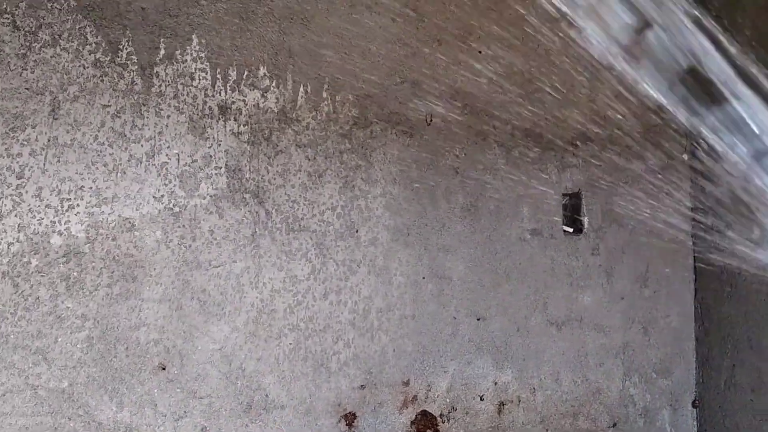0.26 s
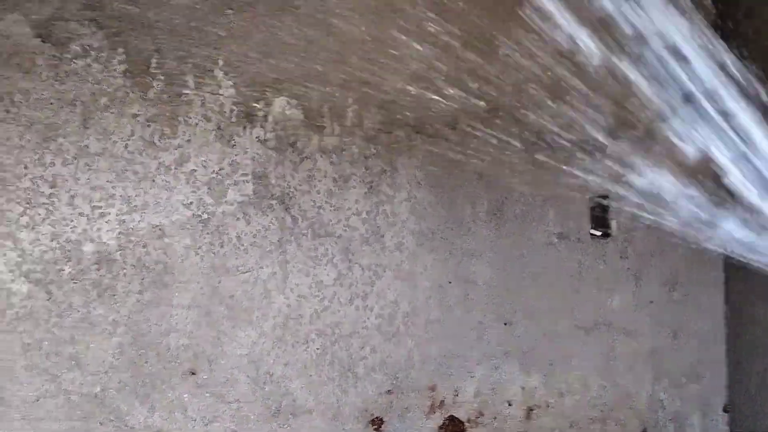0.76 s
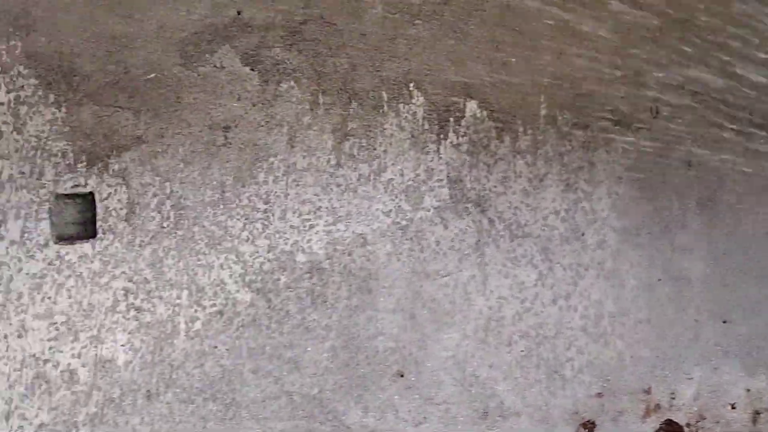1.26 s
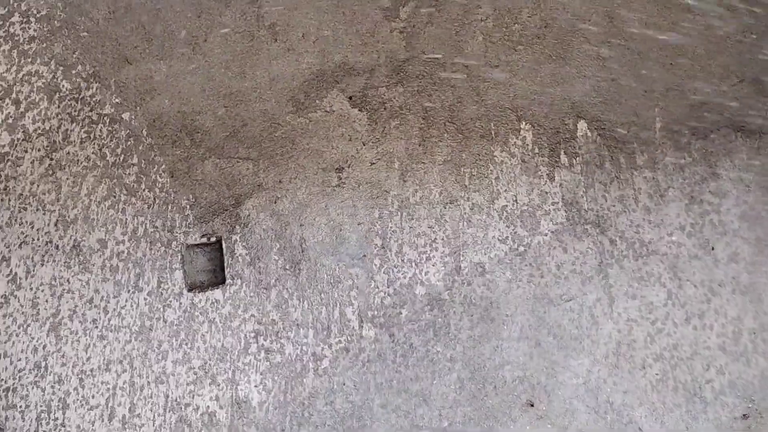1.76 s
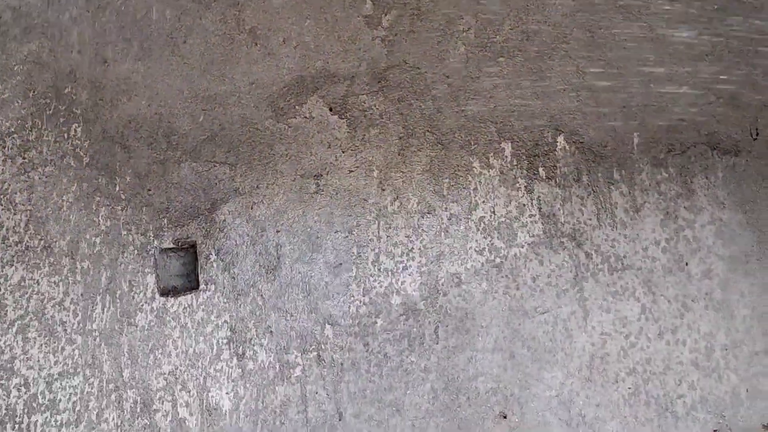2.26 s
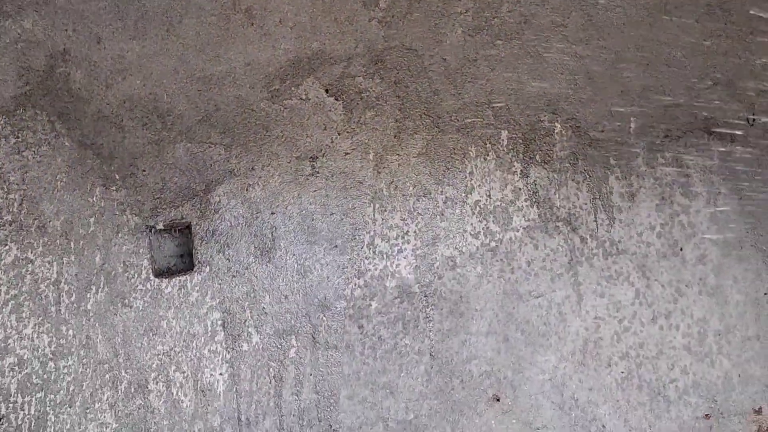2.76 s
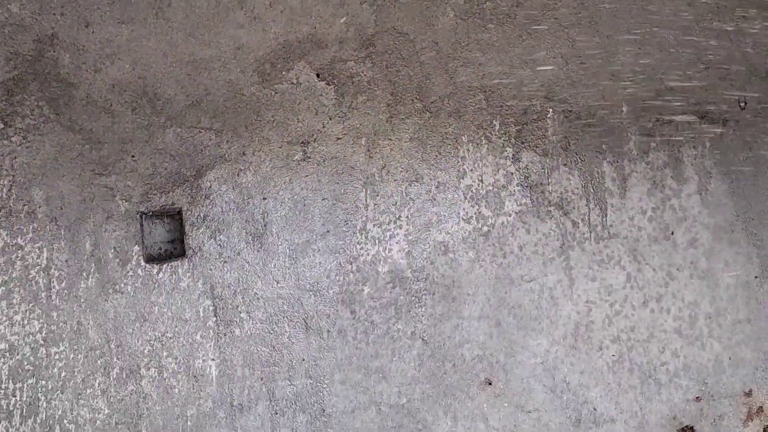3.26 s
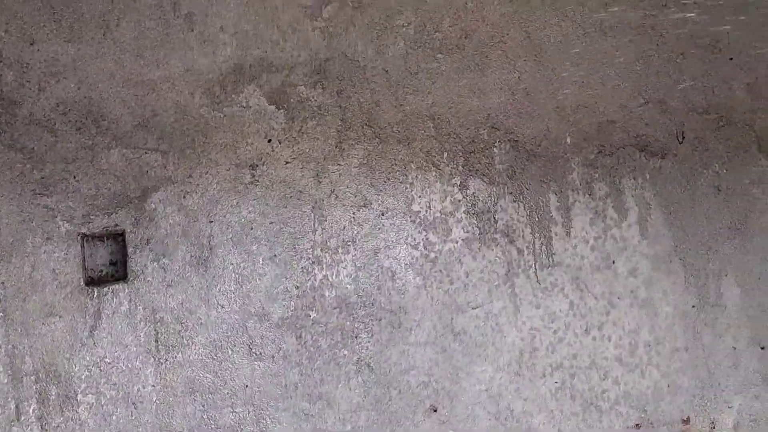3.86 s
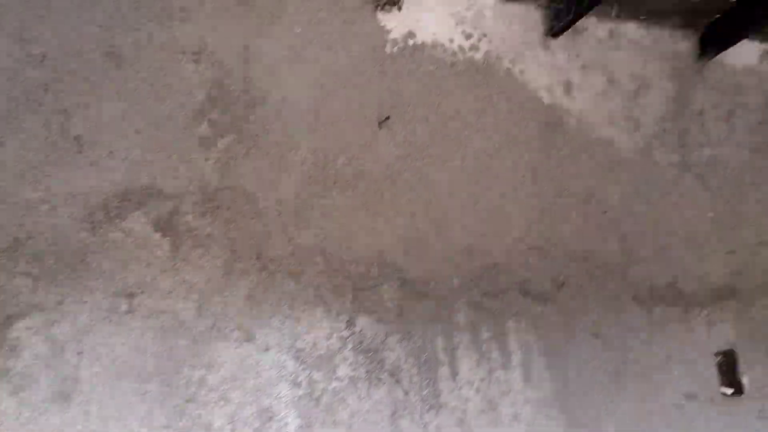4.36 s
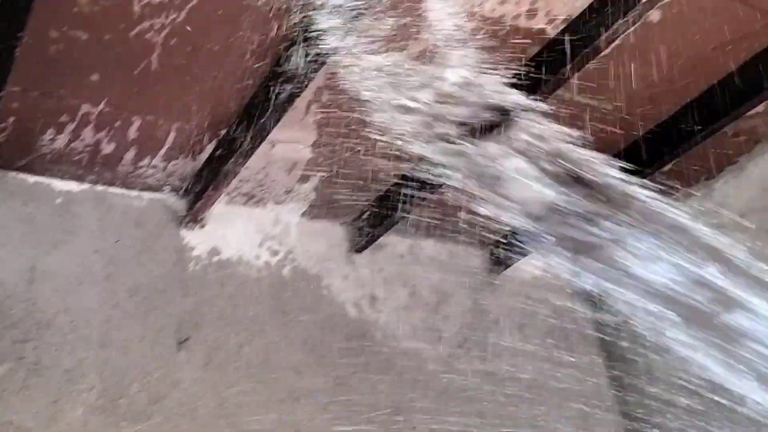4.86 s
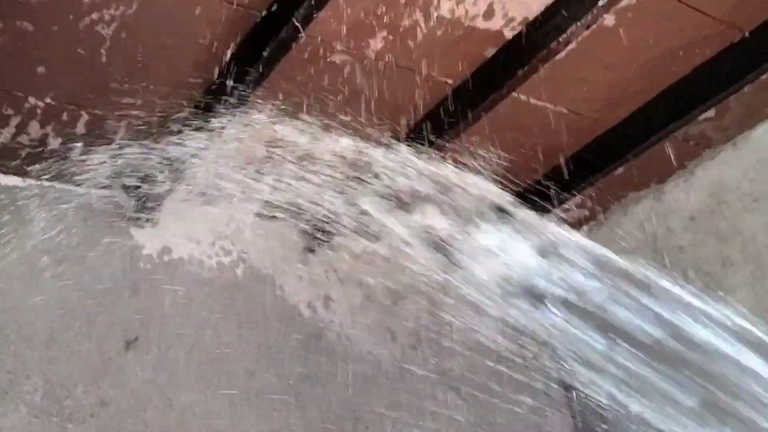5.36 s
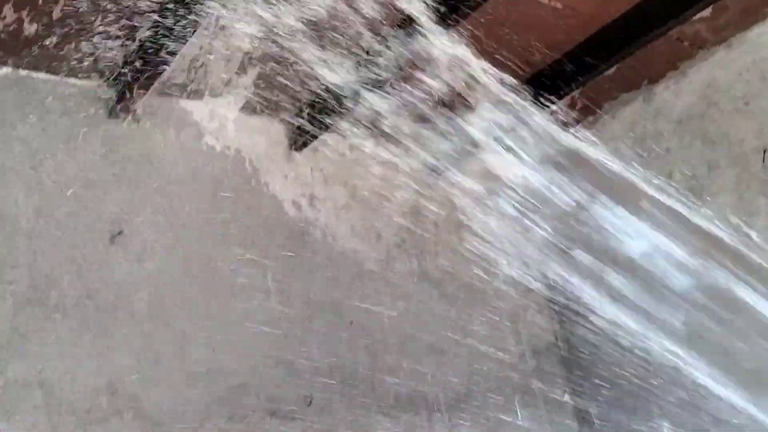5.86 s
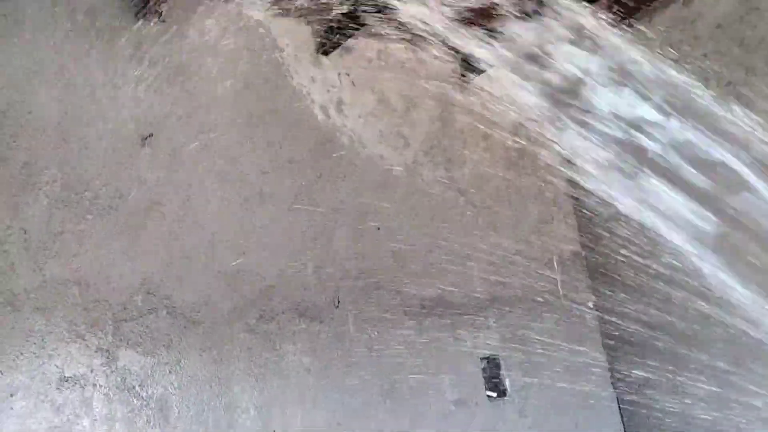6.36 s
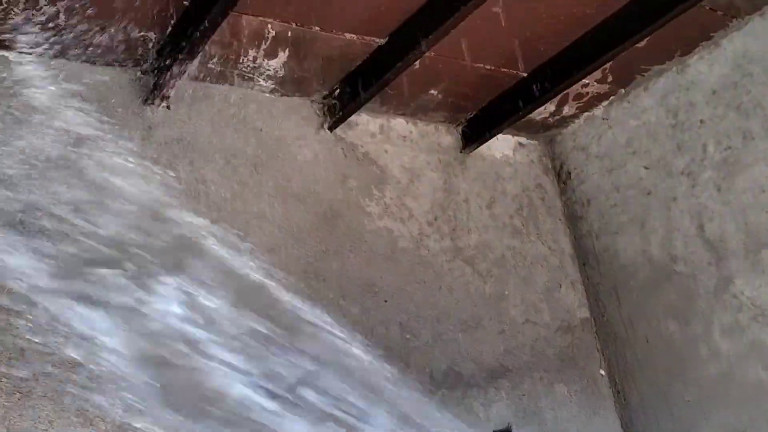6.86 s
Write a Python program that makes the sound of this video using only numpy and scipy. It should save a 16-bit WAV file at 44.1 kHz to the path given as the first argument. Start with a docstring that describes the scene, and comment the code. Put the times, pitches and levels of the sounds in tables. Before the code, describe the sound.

A hose jet plays on a concrete wall in a small bare room, heard close by on a handheld stereo microphone. It opens with coarse splashing, a low thud and tiny drop clicks, then thins to a weaker hiss around 0.5-0.8 s. From 0.9 s it surges back with tearing spits and slaps; at about 1.5 s a short low puff of air hits the right side, with a sharp near drop. Around 1.9 s comes a small hollow double knock of bubbles, then gurgling film and a wet burst at 2.3 s. From 2.6 to 3.9 s steady hiss rides over deeper drumming and dull thuds. It eases near 4.2 s, then swells from 4.5 s as water strikes roof boards, with dense slaps and ripping spray. Clicks tick close at 5.7 s; the fullest gush comes near 6.9 s, still running at the end.

```python
"""Hose jet on a concrete wall

A hose jet sweeps over a concrete wall and up into the roof boards of a small bare room.
Random impacts, filtered by drop size, give the hiss of fine spray and the splash and drumming of thick water.
Decaying noise makes torn sheets, slugs and stray drops; rising tones make trapped air.
Low filtered noise makes the room's background and gusts of draught, mostly on the right microphone port.
"""
import sys
import numpy as np
from scipy import signal
from scipy.fft import rfft, irfft
from scipy.io import wavfile
from scipy.ndimage import uniform_filter1d, minimum_filter1d

SR = 44100
rng = np.random.default_rng(int(sys.argv[2]) if len(sys.argv) > 2 else 0)


def generate_wav(sig):
    """Save sig (samples, or channels by samples) to the path in sys.argv[1] as 16-bit PCM at SR."""
    pcm = np.round(np.clip(np.atleast_2d(sig).T, -1, 1) * 32767).astype(np.int16)
    wavfile.write(sys.argv[1], SR, pcm)


N = 313110
TIME = np.arange(N) / SR


def amp(db):
    """Decibel law: 20 dB for each factor of ten in amplitude."""
    return 10 ** (np.asarray(db) / 20)


def evened(x):
    """Power normalization: the mean of the two channels gets unit power."""
    return x / np.sqrt(np.mean(x.mean(0) ** 2) + 1e-20)


def read(points, hz):
    """Interpolation of a spectrum along a logarithmic frequency axis."""
    f, value = np.transpose(points)
    return np.interp(np.log(hz + 1), np.log(f), value)


def follow(rows):
    """Linear interpolation in time: the columns of a curve table at every sample."""
    s, *columns = np.transpose(rows)
    return [np.interp(TIME, s, c) for c in columns]


def add(mix, s, sound):
    """Superposition: a stereo sound is summed into the mix from a given time."""
    part = mix[:, max(round(s * SR), 0):][:, :sound.shape[1]]
    part += sound[:, :part.shape[1]]


def wander(hz):
    """Low-pass random fluctuation of unit spread, slow up to about a given rate."""
    f = np.fft.rfftfreq(N, 1 / SR)
    slow = irfft(rfft(rng.standard_normal(N)) / (1 + (f / hz) ** 4), N)
    return slow / slow.std()


def clumps(per_s, fade_s, size=N):
    """Shot noise: clumps land suddenly at random and scatter exponentially; zero mean, unit spread."""
    # one extra second lets the fluctuation settle before it is used
    landings = rng.random(size + SR) < per_s / SR
    flow = signal.lfilter([1], [1, -np.exp(-1 / (fade_s * SR))], landings)[SR:]
    return (flow - flow.mean()) / flow.std()


def shape(x, gain):
    """Minimum-phase filtering: a causal response with a given gain against frequency."""
    size = 4096
    hz = abs(np.fft.fftfreq(size, 1 / SR))
    log_gain = np.log(np.maximum(gain(hz), 1e-5))
    # the Hilbert transform of the log gain supplies the phase
    spectrum = np.exp(np.conj(signal.hilbert(log_gain)))
    taps = np.fft.ifft(spectrum).real[:size // 2]
    return signal.oaconvolve(x, taps[None], axes=1)[:, :x.shape[1]]


def colour(x, points):
    """Spectral shaping at unit power, with a steep fall above the last point."""
    last_hz = points[-1][0]
    return evened(shape(x, lambda hz: amp(read(points, hz)) / (1 + (hz / last_hz) ** 16)))


def shelf(x, kind, edge_hz, db):
    """Shelving: the "low" or "high" side of a sound is raised or lowered by a level or a curve."""
    sections = signal.butter(3, edge_hz, kind, fs=SR, output="sos")
    side = signal.sosfiltfilt(sections, x)
    return x + side * (amp(db) - 1)


# likeness of the two ports: frequency_hz, coherence (0 to 1)
PORT_COHERENCE = [(60, 0.84), (270, 0.94), (450, 0.79), (740, 0.53), (1220, 0.004), (2000, 0.0051)]
# level of the left port above the right: frequency_hz, difference_db
PORT_DIFFERENCE = [(80, 0), (200, 3), (550, 1.5), (800, 1), (1700, 3), (2600, 3), (3600, 4.5), (5000, 1.6),
                   (6700, -1), (8500, 9), (11800, 10), (14800, 0)]


def ports(x):
    """Coherence between close ports: long waves are largely shared, and the left hears more treble."""
    hz = np.fft.rfftfreq(x.shape[1], 1 / SR)
    angle = np.arcsin(np.clip(read(PORT_COHERENCE, hz), -1, 1)) / 2
    z = rfft(x)
    z = np.cos(angle) * z + np.sin(angle) * z[::-1]
    return irfft(z * amp(np.outer([.5, -.5], read(PORT_DIFFERENCE, hz))), x.shape[1])


# reverberation of the bare room: frequency_hz, t60_s
ROOM_DECAY = [(200, 0.37), (1000, 0.77), (4000, 0.22), (12000, 0.72)]


def room(x, wet_db):
    """Diffuse reverberation: three dense decays trade weights once a second, so the echoes keep changing."""
    size = 20000
    out = x.copy()
    for k in range(3):
        hz, t, z = signal.stft(rng.standard_normal((2, size)), SR, nperseg=256)
        decay = amp(-60 * t / read(ROOM_DECAY, hz)[:, None])
        tail = signal.istft(z * decay, SR, nperseg=256)[1]
        tail = tail / np.linalg.norm(tail[0])
        weight = np.sqrt(2 / 3) * np.cos(2 * np.pi * (TIME + k / 3))
        out += amp(wet_db) * signal.oaconvolve(x * weight, tail, axes=1)[:, :N]
    return out


def drops(per_s, spread_db):
    """Random impulses of very unequal size, each reaching the two ports a little apart in time."""
    chance, size, side = rng.random(N), rng.exponential(1, N), rng.uniform(-1, 1, N)
    at = np.flatnonzero(chance < per_s / SR)
    push = (amp(spread_db * np.minimum(size, 5)) * rng.choice([-1, 1], N))[at]
    lag = np.round(20 * side[at]).astype(int)  # samples
    first = np.bincount(at, push, N)
    second = np.bincount((at + lag) % N, push * rng.choice([-1, 1], N)[at], N)
    return np.array([first, second])


def patter(sizes, per_s, spread_db, clump_db, clumps_per_s, fade_s):
    """Size-dependent excitation: each drop size clumps in its own band, so the colour keeps shifting."""
    def share(hz, centre):
        bands_away = np.log((hz + 1) / centre) / np.log(sizes[1] / sizes[0])
        return 1 / (1 + (bands_away * 2) ** 4)

    out = np.zeros((2, N))
    for centre in sizes:
        hits = drops(per_s, spread_db) * amp(clump_db * clumps(clumps_per_s, fade_s))
        # the power shares of all the bands add up to one
        out += shape(hits, lambda hz: np.sqrt(share(hz, centre) / sum(share(hz, c) for c in sizes)))
    return out


def bunching(rows, lull_db, lull_s):
    """Bunching of a jet in flight: the level (dB) sinks in a short lull ahead of each slug."""
    return -lull_db * sum((TIME < s) * np.exp(-abs(TIME - s) / lull_s) for s, *_ in rows)


def thick_flow():
    """Inertia of thick water: the jet level without its quickest changes, in dB above the usual."""
    usual_db, sluggish_s = -25, 0.11
    return uniform_filter1d(follow(JET)[0], round(sluggish_s * SR), mode="nearest") - usual_db


# surfaces under the jet, from the near wall over the roof edge, boards and beams and back to the wall:
# reached_s (middle of the crossing), crossing_s, splash_db, drumming_db, drumming_depth_db, coarse_spray_db
SURFACE_ROWS = [(0.0, .1, 0.5, 3, -3.5, -3), (0.45, 0.13, -1.5, -9, -1, 2.5),
                (0.87, 0.26, -5, -2.5, -6, -0.5), (1.32, 0.049, -2.5, 2.5, -5, 0),
                (2.05, 0.2, -5.8, 0, -3.5, -1), (2.95, 0.18, -1, 5.5, 1.5, -0.5),
                (3.95, 0.34, -2, -2.5, 1.5, 0.5), (4.36, 0.15, 5.5, 3, -0.5, -3.5),
                (4.55, 0.7, 2, -2.5, -1.5, 2.5), (5.38, 0.23, 1, 1, 4, 1.5), (5.8, .13, -1, -1.5, 2.5, 1.5),
                (6.3, .13, -1.5, 1.5, 3.5, 1), (6.9, 0.18, -2, -3.5, 5.5, 2.5)]


def surface():
    """Surface response: splash, drumming, depth and coarseness (dB) blend from each surface to the next."""
    reached, crossing, *columns = np.transpose(SURFACE_ROWS)
    arrived = np.clip((TIME - reached[1:, None]) / crossing[1:, None] + .5, 0, 1)
    return [c[0] + np.diff(c) @ arrived for c in columns]


def gulp(hz, cycles, climb):
    """Bubble resonance: trapped air rings briefly and rises in pitch as it nears the surface."""
    t = TIME[:SR // 10]
    # the ring decays by 1/e, and the pitch climbs by its share, in each run of so many cycles
    age = t * hz / cycles
    ring = np.sin(2 * np.pi * hz * t * (1 + climb * age / 2)) * np.sqrt(age) * np.exp(-age)
    return ring / abs(ring).max()


def slug(t60, crack_db, crack_s):
    """Two-stage decay: a short crack, then a ragged run of splats; returns the noise and its fall."""
    t = TIME[:SR // 2]
    fall = amp(crack_db) * np.exp(-t / crack_s) + np.exp(-np.log(1000) * t / max(t60, .01))
    splats = amp(2.2 * np.minimum(clumps(per_s=260, fade_s=.003, size=len(t)), 2))
    return ports(rng.standard_normal((2, len(t))) * splats), fall / fall[0]


def blows(rows, push_db, crack_db, crack_s):
    """Impulse and cavity resonance: a sharp push, then scatter, through air trapped against the wall."""
    out = np.zeros((2, N))
    for s, db, centre_hz, t60, q in rows:
        def cavity(hz):
            return 1 / (1 + (q * (hz / centre_hz - centre_hz / (hz + 1))) ** 4)
        noise, fall = slug(t60, crack_db, crack_s)
        force = noise * fall
        force[:, 0] += amp(push_db)
        scatter_level = shape(noise, cavity).mean(0).std()
        add(out, s, amp(db) * shape(force, cavity) / scatter_level)
    return out


# relative spectrum of the room noise: frequency_hz, level_db
BACKGROUND_COLOUR = [(20, -15), (50, 0), (75, 9), (100, 9), (130, 7.5), (200, 7.5), (500, 10.5),
                     (1500, -1.5), (8000, -51)]


def background():
    """Stationary noise: the low, steady sound of the room."""
    return amp(-54.5) * colour(ports(rng.standard_normal((2, N))), BACKGROUND_COLOUR)


# relative spectrum of the draught: frequency_hz, level_db
TURBULENCE_COLOUR = [(20, -18), (50, -9), (78, -8), (103, 2), (135, -3.5), (190, -7.5), (300, -22),
                     (700, -55)]
# puffs of air: start_s, length_s, peak_db (before the gains of the two ports)
PUFFS = [(1.02, 0.16, -51), (1.156, 0.14, -50), (1.44, .23, -39), (1.52, 0.077, -32), (3.49, .22, -53),
         (3.72, .25, -62)]


def draught():
    """Turbulent pressure noise, mostly on the right port; each gust swells and dies in one arch."""
    skew = 0.59  # under 1, a gust rises faster than it falls
    gusts = np.zeros(N)
    for s, length, db in PUFFS:
        progress = np.clip((TIME - s) / length, 0, 1)
        gusts += amp(db) * np.sin(np.pi * progress ** skew)
    turbulence = colour(rng.standard_normal((2, N)), TURBULENCE_COLOUR)
    return gusts * turbulence * amp([[-16], [2]])


# large bubbles bursting in the running film, a hollow double knock:
# start_s, peak_db (before the echo), pitch_hz (at the start)
BUBBLE_KNOCKS = [(1.903, -26, 880), (1.916, -30, 980)]


def bubbles():
    """Bubble resonance: each large bubble gives a nearly pitched knock with a short echo."""
    out = np.zeros((2, N))
    for s, db, hz in BUBBLE_KNOCKS:
        knock = gulp(hz, cycles=5.5, climb=.025)
        add(out, s, amp(db) * np.tile(knock, (2, 1)))
    return room(out, wet_db=-4)


# stray drops striking close to the microphone: start_s, peak_db, fade_ms (time to fall to 1/e)
NEAR_DROPS = [(0.022, -11, .5), (0.0594, -16, .3), (0.111, -15, .3), (1.5578, -5.5, 1.6), (1.5934, -11, .4),
              (3.1635, -9, .4), (3.2422, -8, .4), (3.8342, -11.5, .5), (5.7297, -4.5, .7),
              (5.744, -5.5, .6), (5.758, -8, 1), (6.3929, -10, .4), (6.857, -7, .6), (6.9137, -9, .3)]


def ticks():
    """Transient noise: a near drop is one dry click that fades within milliseconds."""
    out = np.zeros((2, N))
    t = TIME[:SR // 20]
    for s, db, fade_ms in NEAR_DROPS:
        noise = rng.standard_normal((2, len(t))) * np.exp(-1000 * t / fade_ms)
        click = colour(ports(noise), SPRAY_SPECTRUM)
        click = shelf(click, "high", 4500, -14)
        add(out, s, amp(db) * click / abs(click.mean(0)).max())
    return out


# heavy lumps of water: start_s, level_db (of the scatter, at its start), centre_hz, t60_s, sharpness_q
LUMPS = [(0.057, -21.5, 375, 0.34, 0.9), (0.897, -32.5, 402, 0.35, 0.99), (1.41, -29.5, 516, .3, 0.47),
         (2.206, -39, 380, 0.44, 0.94), (2.68, -30.5, 420, 0.29, 1.25), (2.86, -28, 394, .5, 1.07),
         (2.966, -31, 315, .4, 1), (3.325, -31, 350, 0.77, 0.99), (3.59, -25, 360, 0.22, 1.34),
         (3.78, -30, 360, 0.54, 0.8), (4.88, -32.5, 406, .3, .9), (5.44, -40, 298, .5, 0.75),
         (6.416, -35, 340, 0.46, 1)]


def thuds():
    """Low cavity resonance: heavy lumps of water thud on the surface."""
    return blows(LUMPS, push_db=17, crack_db=-5, crack_s=.012)


# slugs of water: start_s, level_db (of the scatter, at its start), centre_hz, t60_s, sharpness_q
SLUGS = [(0.279, -32, 1600, 0.47, 1.5), (0.813, -36.5, 1900, 0.84, 1.8), (1.035, -35, 1850, 1, 0.83),
         (1.109, -36, 1420, 0.57, 1.2), (1.321, -35.5, 864, 0.8, 0.91), (1.453, -23.5, 1530, 0.49, 1.4),
         (1.59, -25.5, 1310, 0.33, 0.87), (1.899, -32.5, 900, 0.8, 2.2), (2.613, -23, 2550, 1.1, 1.3),
         (3.645, -41, 1800, .5, 0.96), (3.976, -32.5, 1270, 0.26, 1.7), (4.085, -27, 1780, 0.33, 0.67),
         (4.268, -32.5, 1900, 0.54, 1.5), (4.606, -25, 1150, 0.17, 0.84), (4.77, -25, 1930, .7, 1.3),
         (4.879, -24.5, 1130, 0.25, 1.6), (5.119, -28, 1260, 0.92, 1.25), (5.251, -28, 1040, 0.43, 2.3),
         (5.297, -23.5, 1760, .3, 1.5), (5.634, -24, 1290, 1.1, 1), (6.014, -23.5, 1440, 0.44, 1.35),
         (6.143, -31, 1850, .35, 1.1), (6.259, -31, 1390, .3, 0.91), (6.53, -33.5, 850, 1.1, 1.9),
         (6.68, -27, 890, 0.45, 1.8), (6.8495, -19, 1440, 0.42, 1.14)]


def slaps():
    """Middle-range cavity resonance: single slugs of water slap the wall."""
    return blows(SLUGS, push_db=16, crack_db=-5, crack_s=.005)


def pockets(per_s, spread_db):
    """Random bubble collapse: air pockets driven into the water film each give a short, rising gulp."""
    low_hz, high_hz = 246.3, 655
    out = np.zeros((2, N))
    for when, size, strength, side in rng.random((round(per_s * N / SR), 4)):
        ring = gulp(low_hz * (high_hz / low_hz) ** size, cycles=3.5, climb=0.057)
        gains = [np.cos(2 * np.pi * side), np.sin(2 * np.pi * side)]
        add(out, when * N / SR, amp(spread_db * strength) * np.outer(gains, ring))
    return out


# relative spectrum of the drumming: frequency_hz, level_db
DRUM_SPECTRUM = [(65, -53), (110, -22.5), (162, -6), (209, -2.5), (281, 2.5), (330, 0.5), (398, 3),
                 (433, 3.5), (506, 0), (700, 1.5), (910, -14.5), (1540, -120)]


def drumming():
    """Forced surface response: the jet's core beats an uneven, gurgling roll set by each surface."""
    _, surface_db, deep_db, _ = surface()
    # 0.075 dB of drumming for each dB of flow
    level_db = -42.5 + 0.075 * thick_flow() + surface_db
    hits = drops(per_s=1200, spread_db=1.2) * amp(.7 * clumps(per_s=45, fade_s=0.025))
    roll = colour(ports(room(hits, wet_db=0.0)), DRUM_SPECTRUM)
    gulps = evened(ports(room(pockets(per_s=80, spread_db=7), wet_db=-7)))
    roll = shelf(roll + amp(-5.5) * gulps, "low", 323, deep_db)
    return amp(level_db + bunching(LUMPS, lull_db=5, lull_s=0.017)) * roll


# relative spectrum of the splash: frequency_hz, level_db
SPLASH_SPECTRUM = [(320, -38), (550, -6.5), (593, -3), (906, 1.5), (1070, 4), (1790, 1), (1960, -8),
                   (2200, -2), (2860, -6.5), (4840, -120)]
# larger drops, from large to fine: band_centre_hz
SPLASH_BANDS = [620, 850, 1170, 1600]


def splash():
    """Impact noise of larger drops: a weak flow or a film of running water gurgles lower."""
    flow_db = thick_flow()
    # 0.93 dB of splash for each dB of flow
    level_db = -34.5 + 0.93 * flow_db + surface()[0]
    film_at_s, film_half_s, film_peak_db = 2.33, 0.75, 5
    film_db = film_peak_db * np.exp(-((TIME - film_at_s) / film_half_s) ** 2)
    hits = patter(SPLASH_BANDS, per_s=1600, spread_db=2.5, clump_db=2.0, clumps_per_s=71, fade_s=0.037)
    water = colour(ports(room(hits, wet_db=0.5)), SPLASH_SPECTRUM)
    water = shelf(water, "low", 1010, film_db - 0.37 * flow_db)
    return amp(level_db + bunching(SLUGS, lull_db=1, lull_s=0.27)) * water


# sheets of water bursting into spray: start_s, level_db (at the start, before the treble cut), t60_s
SHEETS = [(0.03, -19.5, 0.3), (0.15, -23.5, .12), (0.235, -23.5, 0.32), (0.9125, -20.5, 0.4),
          (1.046, -20, 0.92), (1.328, -25, .25), (1.4325, -20, .1), (1.565, -19, 0.85),
          (1.6721, -19.5, 0.43), (1.874, -27, .16), (1.925, -23, 0.47), (2.177, -26, 0.34),
          (2.294, -16.5, 0.51), (3.162, -27, 0.24), (3.236, -20, 1), (3.576, -25, .3), (3.8351, -18.5, 0.4),
          (4.188, -26, 0.22), (4.795, -20, 0.66), (4.938, -19, 0.33), (5.113, -16, 0.35), (5.17, -16, 0.22),
          (5.733, -16, 0.49), (5.887, -21, 0.28), (5.975, -17, 0.8), (6.14, -17, 0.29), (6.263, -21, 0.4),
          (6.301, -16.5, 0.71), (6.391, -15, 0.34), (6.707, -17, 0.27), (6.8495, -18, 0.41)]


def bursts():
    """Decaying noise: a sheet of water tears on the wall with a spit, duller than the spray."""
    out = np.zeros((2, N))
    for s, db, t60 in SHEETS:
        noise, fall = slug(t60, crack_db=-5, crack_s=.003)
        add(out, s, amp(db) * fall * colour(noise, SPRAY_SPECTRUM))
    return shelf(out, "high", 4550, -8)


# force of the sweeping jet, as the level of its fine spray before lulls and shelves:
# time_s, level_db (points joined by straight lines)
JET = [(0, -24.5), (0.06, -25.5), (0.22, -29), (0.44, -36), (0.52, -35), (0.66, -42.5), (0.8, -41),
       (0.86, -37.5), (0.92, -31), (1.02, -28.5), (1.1, -24.5), (1.22, -29), (1.34, -23.7), (1.7, -25.5),
       (1.82, -31.5), (2.0, -26.5), (2.1, -29.5), (2.16, -34), (2.22, -24), (2.32, -25), (2.44, -28.5),
       (2.66, -24.5), (2.86, -25), (3.06, -26), (3.14, -22.5), (3.28, -21.5), (3.54, -26), (3.64, -24.5),
       (3.88, -26), (4.02, -27.5), (4.14, -31.5), (4.21, -28.5), (4.32, -30.5), (4.37, -28.5), (4.48, -28),
       (4.54, -24.5), (4.76, -20.5), (4.98, -19.5), (5.08, -21), (5.3, -25.5), (5.47, -24), (5.7, -22),
       (5.86, -26.5), (6.06, -23.5), (6.35, -20.5), (6.55, -22), (6.68, -23), (6.83, -22), (6.88, -19),
       (6.95, -18), (7.1, -22.5)]
# relative spectrum of the spray: frequency_hz, level_db
SPRAY_SPECTRUM = [(1120, -38), (1900, -13.5), (2000, -12.5), (2570, -1.5), (3030, -3), (3940, 0.5),
                  (4590, -5.5), (5850, -6), (6510, -15.5), (8330, -31.5), (9400, -48), (12200, -70),
                  (20700, -120)]
# relative spectrum of the mist: frequency_hz, level_db
MIST_SPECTRUM = [(5590, -41), (9500, -24), (10000, 1), (10900, -2.5), (11900, 5.5), (12800, 0), (14800, 4),
                 (15500, 6)]
# fine drops, from large to fine: band_centre_hz
SPRAY_BANDS = [2200, 2650, 3200, 3850, 4650, 5600, 6750, 8100]


def spray():
    """Superposed random impacts: thousands of fine drops a second hiss, with a faint mist above them."""
    level_db = follow(JET)[0] + bunching(SHEETS, lull_db=1.5, lull_s=0.02)
    hits = patter(SPRAY_BANDS, per_s=2900, spread_db=1.0, clump_db=1.38, clumps_per_s=60, fade_s=0.027)
    # the whole spray flutters a little as the jet breaks up
    hits = hits * amp(.7 * clumps(per_s=90, fade_s=.007))
    hiss = colour(ports(room(hits, wet_db=-7.5)), SPRAY_SPECTRUM)
    # a heavier flow makes larger drops, so the treble swells less than the rest
    hiss = shelf(hiss, "high", 4200, -.1 * (level_db - level_db.mean()))
    # some surfaces break the jet into coarser drops than others
    hiss = shelf(hiss, "low", 3000, surface()[3])
    mist = colour(ports(rng.standard_normal((2, N))), MIST_SPECTRUM) * amp(1.2 * wander(16))
    return amp(level_db) * hiss + amp(0.77 * level_db - 40.0) * mist


def scene():
    """Linear superposition of the room, the draught and all the water."""
    surroundings = background() + draught()
    single_events = bubbles() + ticks() + thuds() + slaps() + bursts()
    continuous_water = drumming() + splash() + spray()
    return surroundings + single_events + continuous_water


def record(dry):
    """Peak limiting and band limiting: brief gain dips hold the tallest peaks, then a low-pass."""
    ceiling, window = .92, SR // 400
    edge_hz = 15650
    needed = np.minimum(1, ceiling / (abs(dry).max(0) + 1e-9))
    limited = dry * uniform_filter1d(minimum_filter1d(needed, 2 * window), window)
    low_pass = signal.firwin(511, edge_hz, window=("kaiser", 9), fs=SR)
    return signal.oaconvolve(limited, low_pass[None], "same")


dry = scene()
out = record(dry)
generate_wav(out)
```